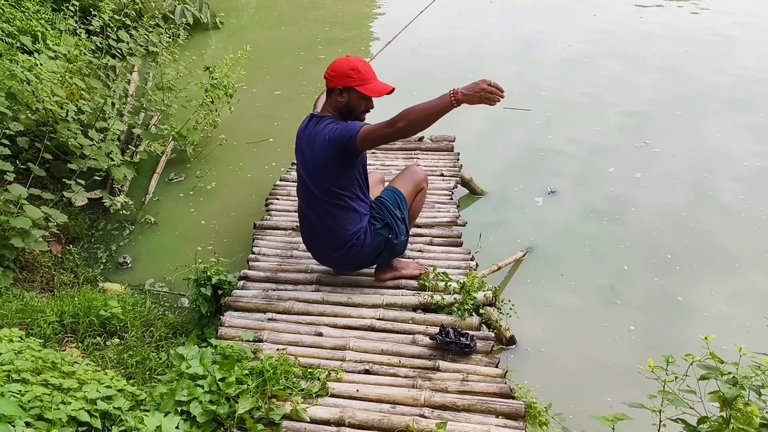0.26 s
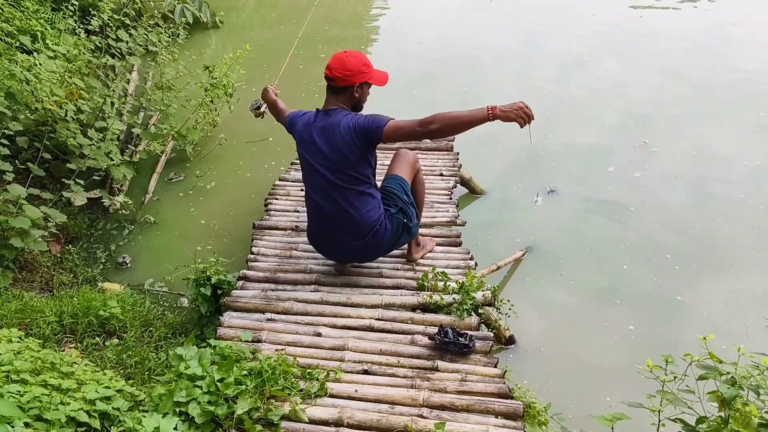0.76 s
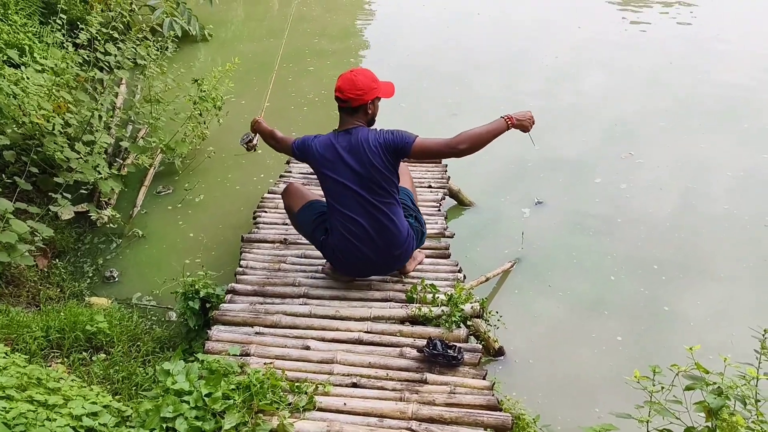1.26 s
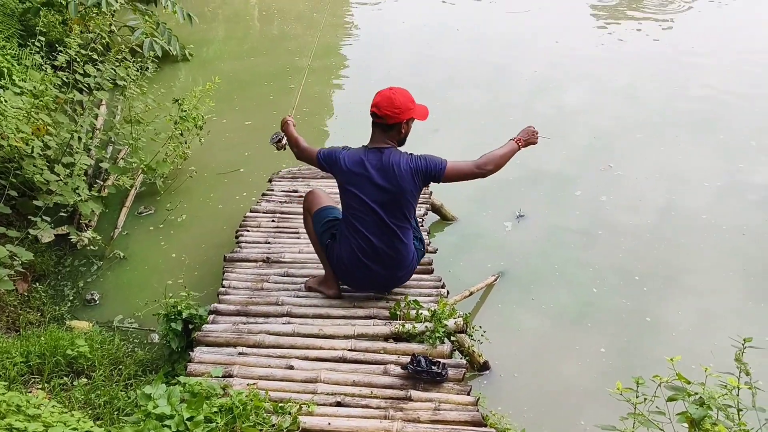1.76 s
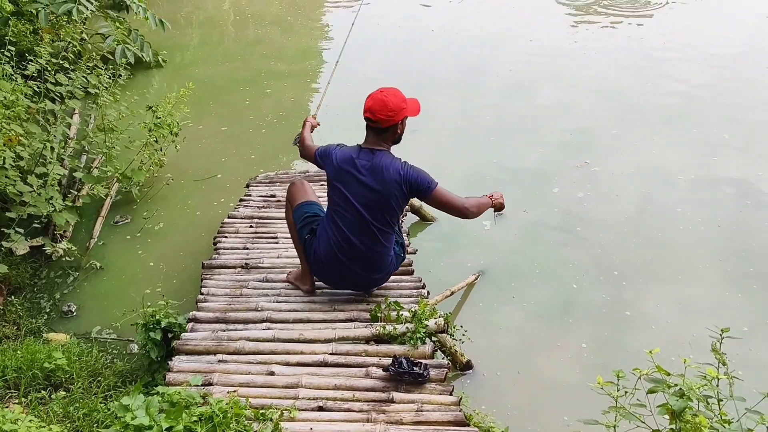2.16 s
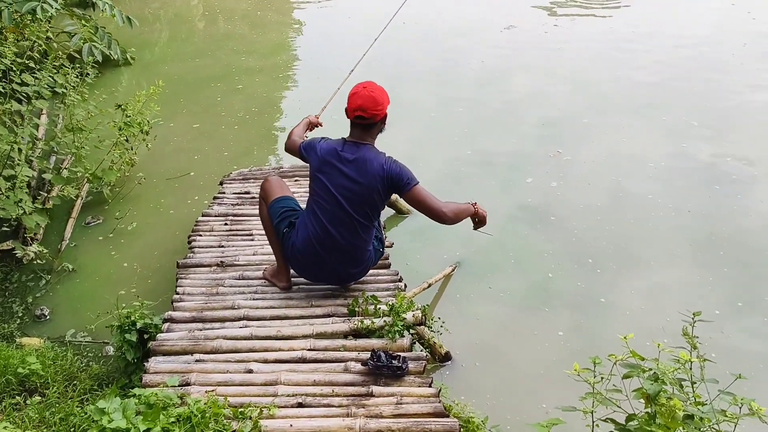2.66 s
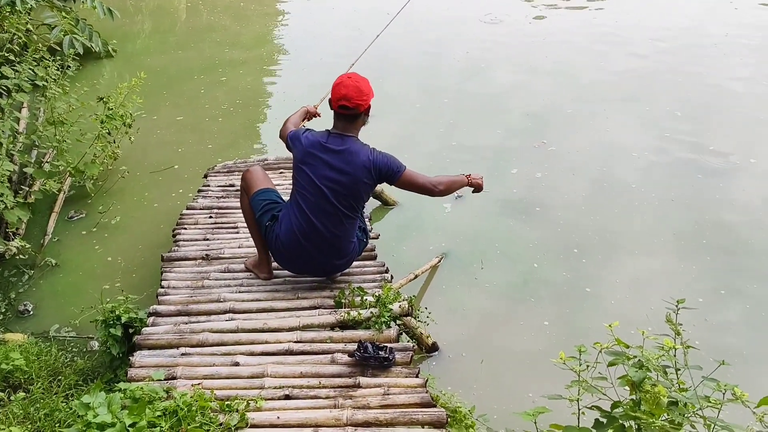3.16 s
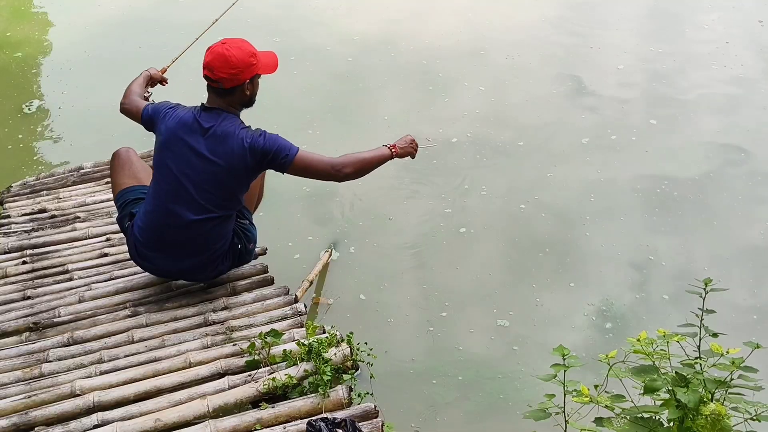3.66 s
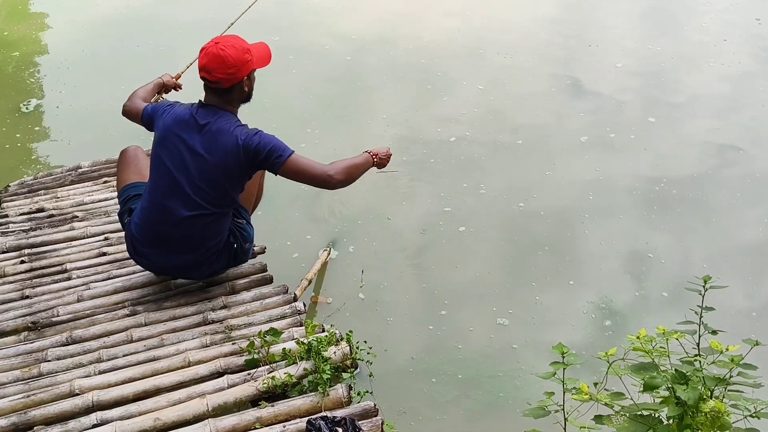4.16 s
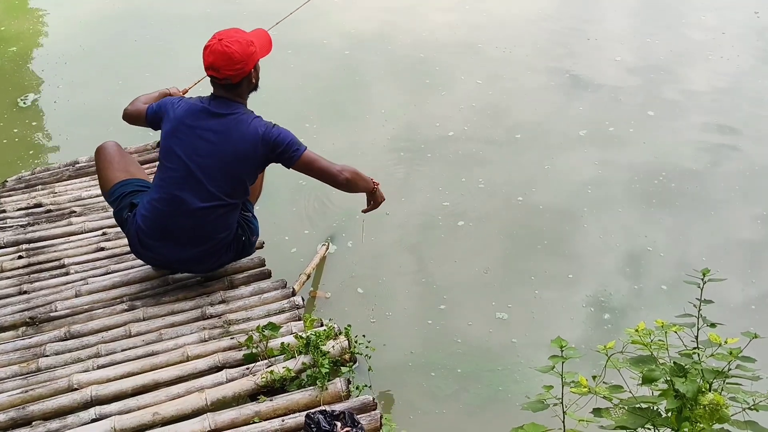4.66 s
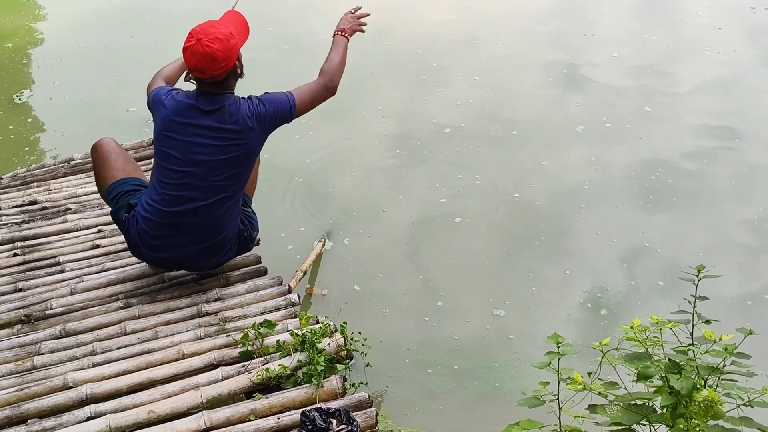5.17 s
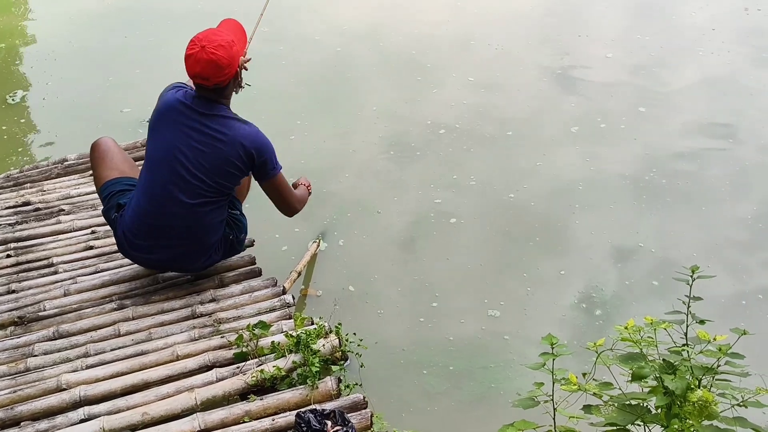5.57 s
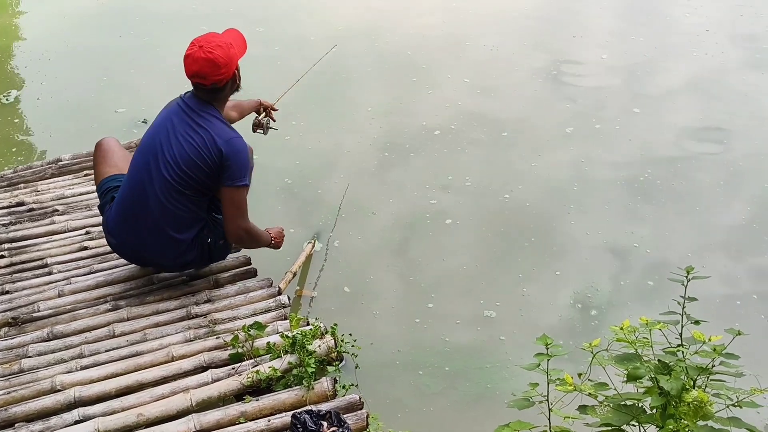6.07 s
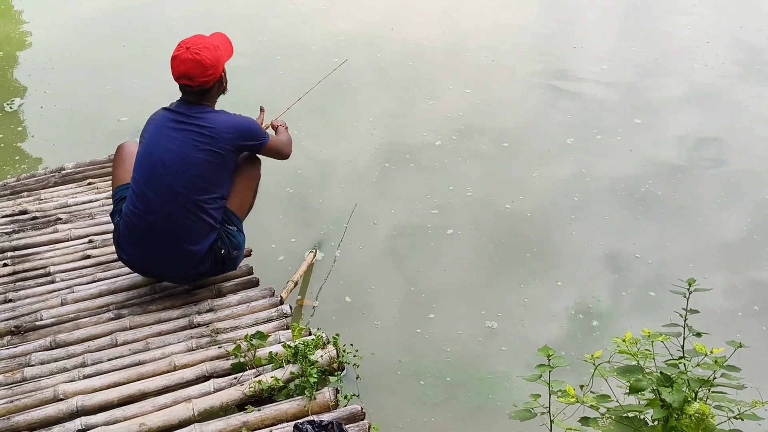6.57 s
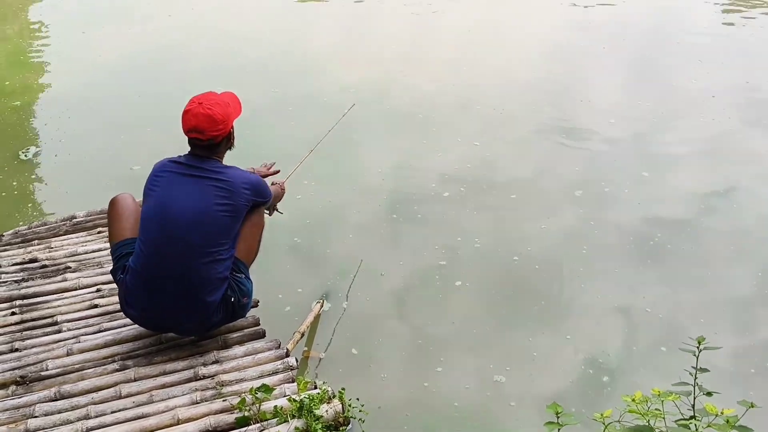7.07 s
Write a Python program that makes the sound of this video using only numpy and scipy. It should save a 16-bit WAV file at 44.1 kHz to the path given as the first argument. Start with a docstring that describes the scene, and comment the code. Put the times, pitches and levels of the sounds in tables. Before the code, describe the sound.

From 0 s a near cicada buzzes steadily, a bright, grainy drone of rapid clicks around 7 to 10 kHz, with short echoes from trees. Under it are soft cricket chirps near 3 kHz, small bamboo taps and leaf or cloth rustles around 0.3 to 0.6 s. At 1.36 to 1.4 s and again at 1.57 to 1.62 s, hard knocks and finger rubs hit the recorder's body, the last loudest, leaning left. A rustle follows at 2 s and a faint water plop at 2.9 s. From 3.2 s the cicada dips several times and stops at 3.5 s, as a small bird gives quick gliding chirps until 3.85 s. Then it is quieter: wide distant insect fizz, low rumble, airy hiss, cricket chirps and hollow taps, busiest from 4 to 5.1 s. Faint falling bird calls come at 4.3, 5.4 and 6.9 s; crisp ticks at 4.85, 5.1 and 6.28 s.

```python
"""A near cicada drones beside a village pond, falters and stops, uncovering far insects that keep fizzing.
A cricket chirps, a small bird sings into the trees, bamboo taps, water plops, leaves rustle, and
knocks and finger rubs come from a camera body. The cicada is a click train through a drum resonance;
bird and cricket are gliding tones with scattered echoes; knocks, taps and plops are short ringing sines.
Shaped noise makes the rustles, the fizz, the low rumble and the air, wide above the bass."""
import sys
import numpy as np
from scipy import signal
from scipy.fft import rfft, irfft, next_fast_len
from scipy.io import wavfile
from scipy.ndimage import uniform_filter1d, map_coordinates

SR = 44100
rng = np.random.default_rng(int(sys.argv[2]) if len(sys.argv) > 2 else 0)


def put_to_file(sound):
    """Save the sound as 16-bit audio at rate SR, in the file named by the first command-line argument."""
    columns = np.atleast_2d(sound).T  # one column per channel
    safe = np.clip(columns, -1, 1)
    whole_steps = np.round(safe * 32767)
    wavfile.write(sys.argv[1], SR, whole_steps.astype(np.int16))


N = 322812
T = np.arange(N) / SR  # [s]

# Near cicada's loudness: (time [s], relative level [dB])
CICADA_LEVEL = [(0, -46.5), (.4, -49.5), (1.2, -50.5), (2.6, -49), (3.1, -50), (3.45, -45.5), (3.5, -63),
                (3.52, -90), (3.6, -96)]
# Colour of the cicada's drum and air sac: (frequency [Hz], relative gain [dB])
CICADA_BODY = [(3710, -72.5), (6300, -54), (6800, -5), (7070, -18.5), (7190, -9), (8460, -8), (9150, -3.5),
               (10050, -1.5), (11500, -17), (12050, -19), (12500, -12), (16200, -52.5), (22000, -120)]
# Camera body knocks: (time [s], then one level [dB] for each mode of the shell)
KNOCK_HITS = [(1.3662, -50, -34, -18.5, -40, -50, -50, -50), (1.3665, -50, -50, -50, -40, -36, -33, -30),
              (1.3671, -50, -40, -40, -32, -30, -30, -23), (1.3811, -40, -19.5, -40, -40, -36, -29, -36),
              (1.3815, -50, -40, -30, -17.5, -40, -40, -40), (1.3897, -50, -40, -22, -34, -36, -36, -29),
              (1.5719, -34, -24, -11, -50, -50, -50, -50), (1.57205, -50, -50, -50, -34, -19, -30, -14),
              (1.593, -45, -27, -34, -47, -45, -47, -47), (1.61995, -60, -9, -40, -50, -50, -50, -50),
              (1.62064, -60, -40, -40, -21, 1, -30, -9), (1.6211, -17, -40, -50, -50, -40, -50, -34)]
# Modes of the shell: (frequency [Hz], time to full swing [cycles], sharpness [exponent],
# left gain [factor], right gain [factor])
SHELL_MODES = [(225, .7, 1.8, 1, -.4), (385, .95, 2, 1, -.55), (520, .9, 2.8, 1, -.42),
               (950, .6, 1.5, -1, .5), (1900, .68, 1.8, -1, .5), (3100, .9, 1.5, 1, -.4),
               (5000, .5, 1.5, 1, -.3)]
# Near bird's notes: (time [s], length [s], first pitch [Hz], pitch the glide heads for [Hz],
# glide time constant [s], peak level before echoes [dB], place of peak [share of length])
NEAR_NOTES = [(3.348, 0.025, 3510, 4400, 0.025, -53, 0.26), (3.37, 0.022, 4610, 6050, .018, -48.5, 0.18),
              (3.472, 0.03, 4650, 6200, 0.014, -46.5, 0.27), (3.597, 0.071, 4840, 6896, 0.0077, -43, 0.47),
              (3.789, 0.017, 5150, 5800, 0.014, -46.5, 0.54), (3.807, 0.054, 5606, 2315, 0.05, -49, 0.047)]
# Far birds' notes, same columns
FAR_NOTES = [(4.33, 0.093, 4280, 3750, 0.1, -67.5, 0.29), (5.35, 0.34, 4163, 2980, .65, -61.5, 0.45),
             (5.64, 0.15, 3710, 3140, 0.12, -68, 0.4), (6.89, 0.11, 4140, 3580, 0.1, -68, 0.42)]
# Cricket chirps: (middle [s], half length [s], relative level [dB])
CHIRPS = [(0, 0.055, -59.5), (0.23, 0.055, -60), (.53, 0.037, -66), (1.007, 0.09, -61.5), (1.2, 0.1, -69.5),
          (1.823, 0.053, -60.5), (2.144, 0.065, -60), (2.816, 0.08, -61.5), (3.068, 0.065, -57.5),
          (3.88, 0.06, -59.5), (4.128, 0.075, -58), (5.426, 0.089, -59), (5.72, 0.076, -63.5),
          (6.244, 0.088, -57.5), (6.476, 0.073, -58), (6.908, 0.064, -56.5)]
# Where the cricket sits: (time [s], left lead [dB])
CRICKET_PAN = [(1.8, -2.5), (2.95, -6), (3.6, -0.5), (7, 1.5)]
# Taps on hollow bamboo: (time [s], level before echoes [dB], pitch [Hz], left lead [dB])
BAMBOO_TAPS = [(.282, -59, 784, -4), (0.388, -46, 1210, 11), (.407, -39, 1233, 6), (0.429, -60, 1230, -3),
               (0.557, -54, 1180, 3), (.661, -58.5, 1190, -3), (3.447, -57, 1576, -9),
               (3.605, -48.5, 1387, 5), (3.604, -55, 2130, 10), (3.874, -56, 1566, -4),
               (3.996, -46.5, 1030, 0), (4.17, -56, 1390, 14), (4.183, -48, 1610, -10),
               (4.207, -50.5, 1460, -1), (4.295, -63.5, 1040, 8.5), (4.32, -60, 960, -2),
               (4.366, -58, 994, 2), (4.394, -59.5, 1570, 2), (4.51, -63, 980, 0), (4.61, -59, 1073, 0),
               (4.665, -63, 950, 0), (4.854, -56, 1010, -9), (4.866, -50, 1610, 7),
               (4.949, -60.5, 1120, 14), (4.98, -55, 1546, -11), (5.015, -54, 765, -8),
               (5.039, -54.5, 756, -16), (5.1, -56, 1030, -9), (5.673, -53.5, 551, 5), (5.8, -63, 1010, 2),
               (6.378, -60, 1960, 2), (6.535, -65, 1474, -7)]
# Sharp ticks: (time [s], snap level [dB], centre [Hz], width [octaves], snap T60 [s],
# ring level [dB], ring T60 [s]); levels before echoes
SHARP_TICKS = [(.2825, -43, 1800, 1.2, 0.0048, -70, .01), (3.9972, -38, 6200, 0.52, .006, -58, .01),
               (3.9972, -48, 2000, .8, 0.0069, -70, .01), (4.1915, -41, 6650, 0.43, 0.0067, -48, .008),
               (4.8515, -33.5, 5400, 0.41, 0.01, -48, .01), (4.853, -49.5, 5440, 1.2, 0.08, -70, 0.0092),
               (4.8674, -50, 3770, 1.3, 0.14, -54, .015), (5.0962, -38.5, 8000, 0.78, .008, -60, .01),
               (5.0965, -55, 5900, .5, 0.09, -41, .015), (5.1015, -48, 7000, .7, .006, -60, .01),
               (6.2766, -30.5, 6950, 0.94, 0.0045, -28, 0.0057), (6.28, -46, 7500, .8, 0.011, -60, .01),
               (6.296, -51, 6150, 0.5, 0.046, -37, 0.025), (6.534, -57.5, 1370, 0.48, .03, -70, .01)]
# Leaf and cloth rustles: (middle [s], half length [s], relative level [dB], centre [Hz], width [octaves])
RUSTLE_PUFFS = [(.17, 0.28, -68, 1750, 0.42), (0.442, 0.048, -48, 4750, 0.97),
                (0.674, .06, -70, 5300, 0.23), (0.424, 0.04, -54.5, 1500, 1.3),
                (0.555, 0.047, -56.5, 5300, 0.44), (0.865, 0.084, -64, 5400, 0.84),
                (1.24, 0.16, -58.5, 5500, 1.26), (1.93, 0.079, -56.5, 5100, 4.5),
                (2.039, 0.041, -46.5, 5100, 1.7), (3.052, 0.024, -52.5, 2870, 5),
                (3.961, 0.12, -67.5, 1710, 0.65), (4.302, 0.079, -66, 5480, 0.12),
                (4.844, 0.02, -57, 3760, 1.3), (5.077, 0.02, -63, 5520, 0.4),
                (6.385, 0.033, -62, 4500, 1.8), (6.86, 0.067, -60.5, 6720, 0.32),
                (7.185, 0.13, -60, 5430, 0.12), (7.21, 0.066, -58, 6050, 0.6),
                (7.174, 0.083, -64.5, 1070, 0.64)]
# Fingers rubbing the left of the camera body: (middle [s], half length [s], relative level [dB], centre [Hz])
FINGER_RUBS = [(1.362, 0.0046, -46.5, 800), (1.382, 0.027, -54.5, 3460), (1.397, 0.0223, -47, 890),
               (1.49, 0.038, -62, 690), (1.578, 0.021, -43, 500), (1.602, 0.018, -40.5, 4700),
               (1.605, 0.03, -48.5, 1500), (1.638, 0.02, -54.5, 3790)]
# Pitches that rustles favour: (frequency [Hz], width [Hz], lift [dB])
RUSTLE_PEAKS = [(2246, 400, 2.5), (3740, 250, 0), (5220, 940, 5)]
# Bubbles in the pond: (time [s], level before echoes [dB], first pitch [Hz])
BUBBLES = [(2.921, -52.5, 890), (4.008, -62, 1060)]
# Far insect bands: (centre [Hz], width [Hz], level [dB], throb rate [Hz], throb depth [0-1], right lead [dB])
INSECT_BANDS = [(7830, 910, -63.5, 26, 0.06, 8), (10380, 830, -71, 40, 0.1, 0.5),
                (15600, 2470, -57, 20, 0.16, 3.5), (3042, 310, -74.5, 9, 0.35, 0)]
# Rumble loudness: (time [s], deep layer level [dB], body layer level [dB])
RUMBLE_LEVELS = [(0, -51.5, -53.5), (.3, -53, -53.5), (1.5, -57.5, -53), (3, -57.5, -53), (3.6, -52, -53.5),
                 (5, -49.5, -52.5), (6.5, -50.5, -53), (7.32, -49, -52)]
# Colours of the ground layers, each: (frequency [Hz], relative gain [dB])
DEEP_COLOUR = [(25, -50.5), (40, -24.5), (55, -6), (70, 1), (90, -5), (120, -8.5), (200, -51)]
BODY_COLOUR = [(50, -38.5), (90, -9), (130, -3.5), (175, -4.5), (240, -13), (330, -15), (500, -24),
               (960, -34.5), (1500, -59)]
AIR_COLOUR = [(400, -30), (900, -2.5), (2000, -9), (4500, -21), (6500, -9), (9000, -18.5), (12000, -2.5),
              (14000, 4), (16000, 1.5)]
# Stereo likeness of noise: (frequency [Hz], left-right correlation [-1 to 1])
EAR_LIKENESS = [(60, 0.92), (130, 0.97), (290, 0.47), (640, -0.49), (1410, -0.34), (3100, -0.17),
                (6820, 0.003), (15000, -0.084)]


def amp(db):
    """Turns decibels into gain."""
    return 10 ** (np.asarray(db) / 20)


def unit(x):
    """Scales a signal to rms 1."""
    return x / np.sqrt(np.mean(x ** 2) + 1e-20)


def along(points, hz):
    """Reads (frequency, value) points on a log frequency axis."""
    f, v = np.transpose(points)
    return np.interp(np.log(hz + 1), np.log(f + 1), v)


def curves(rows):
    """Draws one automation curve per column after the time."""
    s, *columns = np.transpose(rows)
    return [np.interp(T, s, column) for column in columns]


def wobble(rate):
    """Smooth random curve with `rate` knots a second."""
    knots = rng.standard_normal(int(N * rate / SR) + 4)
    return map_coordinates(knots, [T * rate])


def filtered(x, response):
    """Shapes a signal's spectrum with a gain that is a function of frequency."""
    n = x.shape[-1]
    size = next_fast_len(n + 8192)
    gain = response(np.fft.rfftfreq(size, 1 / SR))
    return irfft(rfft(x, size) * gain, size)[..., :n]


def octave_bell(centre_hz, octaves):
    """Gain that falls off as a bell on the octave scale."""
    return lambda hz: np.exp(-(np.log2((hz + 1) / centre_hz) / octaves) ** 2)


def stereo_noise(gain, n=N):
    """Noise of rms 1 whose mid and side shares set how alike the ears are at each pitch."""
    def mid_side_gain(hz):
        turn = np.arccos(np.clip(along(EAR_LIKENESS, hz), -1, 1)) / 2
        return gain(hz) * [np.cos(turn), np.sin(turn)]
    mid, side = filtered(rng.standard_normal((2, n)), mid_side_gain)
    return unit(np.array([mid + side, mid - side]))


def pan(left_lead_db):
    """Left and right gains that differ by the given decibels."""
    return amp([[left_lead_db / 2], [-left_lead_db / 2]])


def echoes(x, t60, count=1):
    """Scattered answer of trees and banks as decaying noise per ear; swaying leaves blend several."""
    t = T[:round(1.2 * t60 * SR)]
    blend = [1]
    if count > 1:
        sway = np.array([wobble(7) for _ in range(count)])
        blend = sway / np.linalg.norm(sway, axis=0)
    tails = amp(-60 * t / t60) * rng.standard_normal((count, 2, SR))[..., :len(t)]
    out = 0
    for weight, tail in zip(blend, tails):
        tail = tail / np.linalg.norm(tail[0])
        out = out + weight * signal.oaconvolve(np.atleast_2d(x), tail, axes=1)[:, :N]
    return out


def add(track, s, sound):
    """Mixes a stereo sound in at time s, or at the start if s is negative."""
    part = track[:, max(round(s * SR), 0):][:, :sound.shape[1]]
    part += sound[:, :part.shape[1]]


def patchy(x, depth_db, size, frame):
    """Makes random patches of gain over time and pitch."""
    spectrum = signal.stft(x, nperseg=frame)[2]
    patches = uniform_filter1d(rng.standard_normal(spectrum.shape[1:]), size=3, axis=0)
    patches = uniform_filter1d(patches, size=size, axis=1)
    return signal.istft(spectrum * amp(depth_db * unit(patches)), nperseg=frame)[1][:, :N]


def falter():
    """Loss [dB] from four brief dips that crowd together before the cicada stops."""
    first_s, wait_s, shrink = 3.222, 0.088, 0.93  # each wait is `shrink` times the last
    half_s, depth_db = 0.03, 12.5
    dips = first_s + wait_s * (1 - shrink ** np.arange(4)) / (1 - shrink)
    return sum(depth_db * np.exp(-((T - s) / half_s) ** 2) for s in dips)


def cicada(click_hz=352.9, stroke_hz=36.84):
    """The drum's ribs click in a fast train; each muscle stroke hurries, drags and swells it."""
    stroke = 2 * np.pi * np.cumsum(stroke_hz + 1.567 * wobble(5)) / SR
    drift = 0.12 * wobble(4) + 0.045 * wobble(20) + 0.012 * wobble(300)
    hurry = 0.059 * np.sin(stroke) + 0.0056 * np.sin(2 * stroke + 0.86)
    phase = 2 * np.pi * click_hz * T + hurry + drift
    clicks = unit(sum(np.cos(k * phase) for k in range(20, 35)))  # only the harmonics in the drum's range
    clicks = clicks * (1 + 0.25 * np.sin(stroke))
    level = amp(curves(CICADA_LEVEL)[0] - falter() + 0.19 * wobble(10.0))
    near = level * (clicks + 0.77 * rng.standard_normal(N))
    spread = 0.08 * near + echoes(near, t60=0.3, count=3)
    heard = filtered(spread, lambda hz: amp(along(CICADA_BODY, hz)))
    return amp(4.0) * pan(-0.81) * unit(heard) * np.sqrt(np.mean(level ** 2))


def knocks():
    """The shell snaps and flexes a few times, its low flex often starting just before the snap.

    The right ear gets each mode later, with its own gain and sign."""
    right_delay_s = 0.00006
    out, t = np.zeros((2, N)), T[:SR // 20]
    for s, *levels in KNOCK_HITS:
        for db, (hz, cycles, sharp, left, right) in zip(levels, SHELL_MODES):
            u = hz * t / cycles
            swing = (u * np.exp(1 - u)) ** sharp  # rises to 1 after `cycles`, then dies
            ring = amp(db) * swing * np.sin(2 * np.pi * hz * t)
            add(out, s, ring * [[left], [0]])
            add(out, s + right_delay_s, ring * [[0], [right]])
    return out


def whistle(notes, flutter_db, waver):
    """A fluttering sine glides ever slower towards a goal pitch, which long glides do not reach."""
    edge_db = 9  # start and end of a note under its peak
    out, unsteady = np.zeros(N), 1 + waver * wobble(150)
    for s, length, first_hz, goal_hz, glide, db, peak in notes:
        hz = goal_hz + (first_hz - goal_hz) * np.exp(-np.clip(T - s, 0, length) / glide)
        peak_s = s + np.clip(peak, 0.05, 0.95) * length
        away = np.interp(T, [s, peak_s, s + length], [1, 0, 1])  # 0 at the peak, 1 at and beyond the ends
        swell = amp(db - edge_db * away ** 2) * (away < 1)
        out += swell * np.sin(2 * np.pi * np.cumsum(hz * unsteady) / SR)
    return np.sqrt(2) * out * amp(flutter_db * wobble(120))


def birds():
    """The near bird rings on in the trees; the far ones mix short echoes with an opposite-phase direct tone."""
    near = whistle(NEAR_NOTES, flutter_db=2.5, waver=0.007)
    far = whistle(FAR_NOTES, flutter_db=3.5, waver=0.023)
    branches = amp(2.5 * wobble(90)) * (0.18 * near + 1.2 * echoes(near, t60=0.16))  # nearest branches
    trees = amp(2) * echoes(near, t60=0.61, count=3)
    distant = 0.76 * echoes(far, t60=0.17) + 0.66 * far * [[1], [-1]]
    return branches + trees + distant


def cricket(hz=3100, pulse_rate=72):
    """Each chirp is a row of wing strokes, each a short tone that sags; distance blurs them."""
    stroke = np.cumsum(pulse_rate * (1 + 0.0793 * wobble(15))) / SR % 1
    pitch = hz * (1 + 0.03 * (0.5 - stroke) + 0.038 * wobble(100))
    pulses = np.sin(np.pi * stroke) ** 4 * amp(4.1 * wobble(50))
    tone = unit(pulses * np.sin(2 * np.pi * np.cumsum(pitch) / SR))
    chirps = sum(amp(db) * np.exp(-((T - s) / half) ** 2) for s, half, db in CHIRPS)
    near = tone * pan(curves(CRICKET_PAN)[0])[:, 0] * chirps
    return 0.39 * near * [[1], [-1]] + 0.82 * echoes(near, t60=0.2)  # direct sound opposite in the ears


def taps():
    """A tap rings a hollow bamboo pole briefly, a sine roughened by narrow noise at its pitch."""
    t60, rise_s = 0.049, 0.0025
    out, t = np.zeros((2, N)), T[:SR // 5]
    envelope = (1 - np.exp(-t / rise_s)) * amp(-60 * t / t60)
    for s, db, hz, left_db in BAMBOO_TAPS:
        ring = np.sin(2 * np.pi * hz * t)
        noise = rng.standard_normal(len(t))
        grain = unit(filtered(noise, lambda f: np.exp(-((f - hz) / (0.26 * hz)) ** 2)))
        add(out, s, amp(db) * pan(left_db) * (ring + 0.5 * grain) * envelope)
    return out


def ticks():
    """A tick is a snap of band noise with a brief sine ring at the same pitch."""
    rise_s, left_db = 0.00073, -1.5
    out, t = np.zeros((2, N)), T[:SR // 5]
    for s, db, hz, octaves, t60, ring_db, ring_t60 in SHARP_TICKS:
        snap = unit(filtered(rng.standard_normal(len(t)), octave_bell(hz, octaves)))
        snap = amp(db - 60 * t / t60) * snap
        ring = amp(ring_db - 60 * t / ring_t60) * np.sin(2 * np.pi * hz * t)
        add(out, s, pan(left_db) * (snap + ring) * (1 - np.exp(-t / rise_s)))
    return out


def small_sounds():
    """Taps and ticks share one short scattered echo."""
    near = taps() + ticks()
    return near + amp(-3) * echoes(near, t60=0.18)


def rustles():
    """Puffs of leaf, cloth and finger noise, crackly and uneven inside."""
    rub_octaves, rub_left_db, rustle_left_db = 0.97, 13.5, -1.5
    lead_s = 1 / 4  # puffs peak this far in, so none peaks earlier than this
    out, t = np.zeros((2, N)), T[:SR // 2] - lead_s
    puffs = [(*row, rustle_left_db) for row in RUSTLE_PUFFS]
    puffs += [(*row, rub_octaves, rub_left_db) for row in FINGER_RUBS]
    for s, half, db, hz, octaves, left_db in puffs:
        puff = stereo_noise(octave_bell(hz, octaves), len(t))
        envelope = np.exp(-0.8 * np.abs(t / half) ** 1.4)
        add(out, s - lead_s, amp(db) * pan(left_db) * puff * envelope)

    def favoured(f):
        lift_db = sum(db / (1 + (2 * (f - hz) / width) ** 2) for hz, width, db in RUSTLE_PEAKS)
        return amp(lift_db - 3)
    out = filtered(out, favoured)
    return patchy(out, depth_db=2.8, size=8, frame=128) * amp(2.8 * wobble(300))


def plops():
    """A bubble rings softly and climbs in pitch as it nears the surface."""
    rise_per_s, t60 = 14, 0.087  # climb as a share of first pitch per second; decay [s]
    out, t = np.zeros((2, N)), T[:SR // 10]
    envelope = (1 - np.exp(-t / 0.0012)) * amp(-60 * t / t60)
    for s, db, hz in BUBBLES:
        tone = np.sin(2 * np.pi * hz * (t + rise_per_s * t ** 2 / 2))
        add(out, s, pan(-1.9) * amp(db) * envelope * tone)
    return out + amp(-3.5) * echoes(out, t60=0.1)


def chorus():
    """Many far insects blur into throbbing bands of fizz."""
    out = np.zeros((2, N))
    for hz, width, db, rate, depth, right_db in INSECT_BANDS:
        beat = 2 * np.pi * np.cumsum(rate * (1 + 0.048 * wobble(2.7))) / SR
        throb = 1 + depth * np.sin(beat)
        fizz = stereo_noise(lambda f: 1 / (1 + (2 * (f - hz) / width) ** 2))
        out += amp(db + 1.1 * wobble(1.5)) * throb * pan(-right_db) * fizz
    return out


def ground():
    """Far rumble, nearly alike in both ears at its lowest, under the thin hiss of open air."""
    deep_db, body_db = curves(RUMBLE_LEVELS)
    lowest = stereo_noise(lambda f: np.exp(-((f - 44) / 15) ** 2))
    lowest = amp(-60.5 + 0.68 * wobble(3.67)) * lowest
    deep = amp(deep_db) * stereo_noise(lambda f: amp(along(DEEP_COLOUR, f)))
    body = amp(body_db + 1.32 * wobble(8)) * stereo_noise(lambda f: amp(along(BODY_COLOUR, f)))
    air = stereo_noise(lambda f: amp(along(AIR_COLOUR, f)))
    air = patchy(air, depth_db=3.2, size=10, frame=512)
    return lowest + deep + body + amp(-58.5) * air


def scene():
    """Sums everything at the pond, from the cicada down to the background."""
    near = cicada() + knocks() + birds() + cricket()
    details = small_sounds() + rustles() + plops()
    return near + details + chorus() + ground()


def record(dry):
    """Squeezes the loudest peaks softly, then keeps nothing above the band limit."""
    ceiling, band_limit_hz = 1.02, 15650
    squeezed = dry / (1 + np.abs(dry / ceiling) ** 6) ** (1 / 6)
    return filtered(squeezed, lambda hz: hz < band_limit_hz)


dry = scene()
out = record(dry)
put_to_file(out)
```